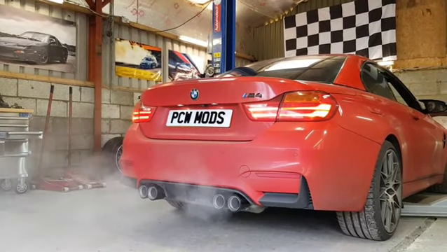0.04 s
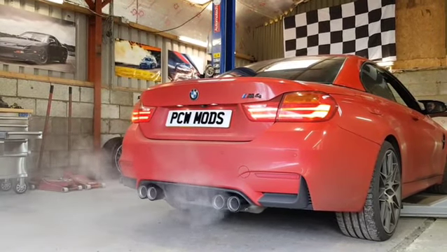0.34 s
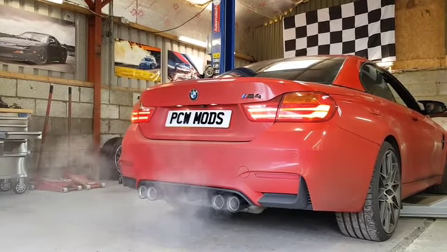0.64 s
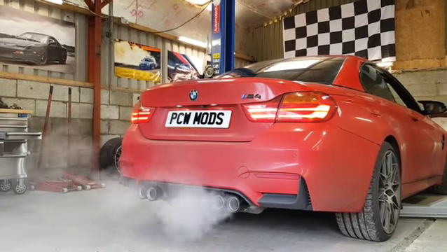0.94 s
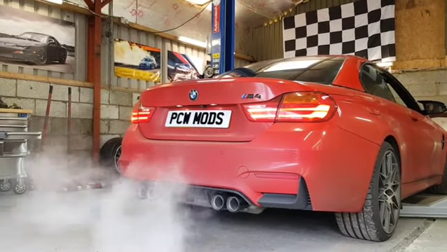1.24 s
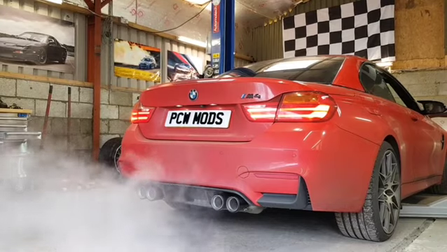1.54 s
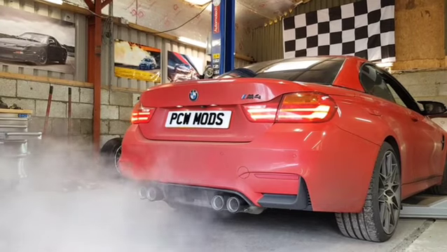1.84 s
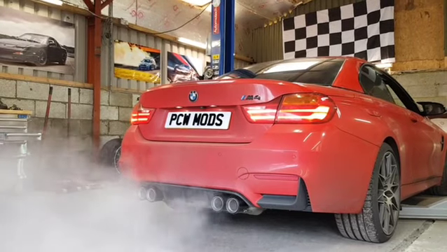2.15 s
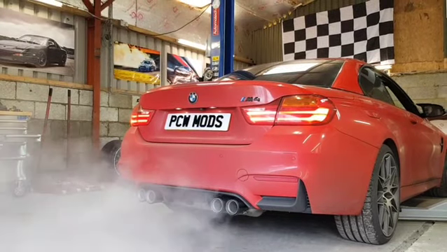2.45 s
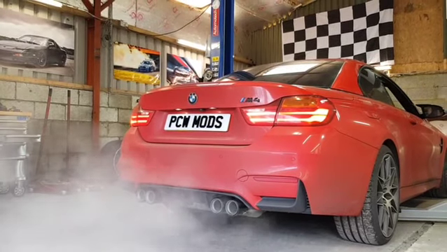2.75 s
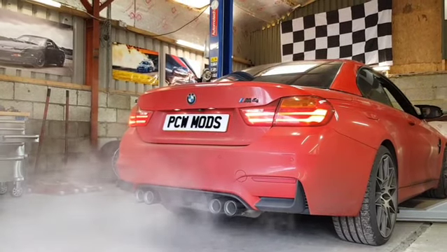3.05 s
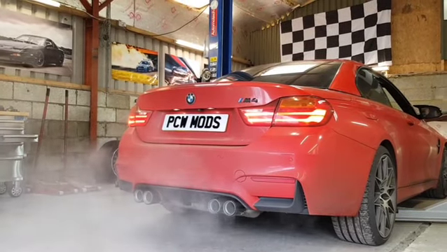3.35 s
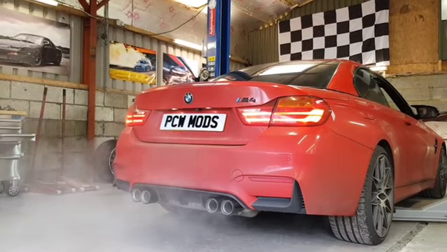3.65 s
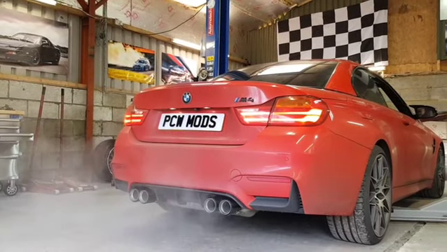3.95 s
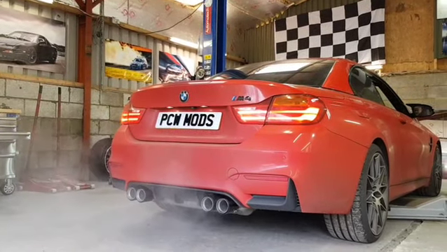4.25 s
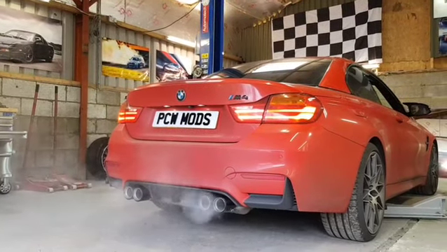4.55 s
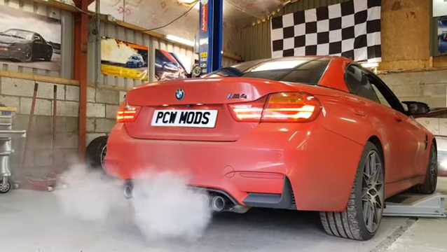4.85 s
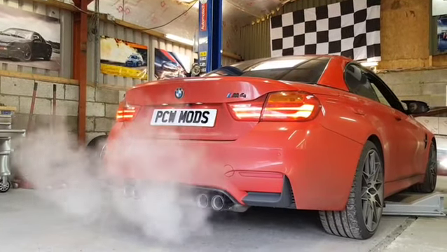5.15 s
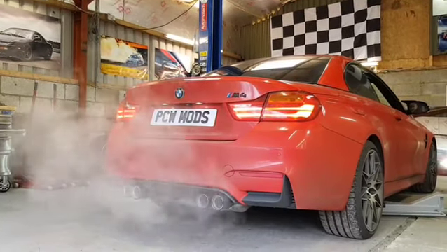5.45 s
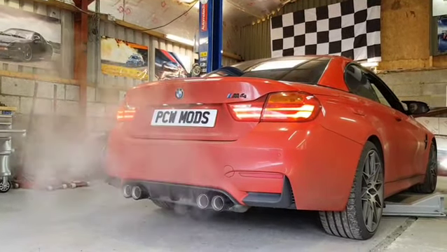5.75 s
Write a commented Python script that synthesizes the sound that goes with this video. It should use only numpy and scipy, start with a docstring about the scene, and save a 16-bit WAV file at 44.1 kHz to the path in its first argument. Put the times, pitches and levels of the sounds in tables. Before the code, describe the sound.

A six-cylinder sports car settles to a low idle, then revs with a deep boom that sharpens into a metallic rasp. The engine burbles back down as the exhaust fires off pops and sharp cracks. After a short idle, a second, lower rev follows and crackles away. The microphone is just behind the tailpipes, and the workshop walls throw back short echoes.

```python
"""A six-cylinder sports car is revved twice in a workshop, heard from just behind its tailpipes.
It sinks to idle, then at 0.8 s a blip booms in the pipes and sharpens to a metallic rasp as the revs
climb. From 1.4 s it burbles back down while unburnt fuel goes off in pops and sharp cracks that the
walls throw back. After a spell of idling, a second, lower rev starts at 4.5 s and crackles away."""
import sys
import numpy as np
from scipy import signal
from scipy.fft import rfft, irfft
from scipy.io import wavfile
from scipy.ndimage import uniform_filter1d

SR = 44100
rng = np.random.default_rng(int(sys.argv[2]) if len(sys.argv) > 2 else 0)


def to_wav(s):
    """Save 16-bit WAV."""
    ch = np.atleast_2d(s).T  # columns
    pcm = np.round(np.clip(ch, -1, 1) * 32767)  # PCM
    wavfile.write(sys.argv[1], SR, pcm.astype(np.int16))


N = 261072
TIME = np.arange(N) / SR
BINS = np.fft.rfftfreq(16384, 1 / SR)


def engine_note(turns, pull_db_per_octave=1.0, coast_db_per_octave=9, flutter_db=5):
    """The lowest engine orders swell through pipe resonances, and flutter and smear when firing is rough."""
    # Harmonics of one bank's firing rate, from the first. Each row: idling, pulling, coasting level in dB.
    orders = [(-42, -27.5, -42), (-32, -12.5, -45), (-41, -19.5, -46), (-38, -22, -47.5), (-41, -21.5, -53),
              (-57, -21.5, -46), (-43.5, -23, -56), (-36, -25, -52)]
    # How the pipes pass those tones. Each row: frequency in Hz, gain in dB.
    pipe_gain = [(25, -17), (44, -12), (56, 2.5), (68, -11), (81, -11.5), (97, -9), (111, -0.5), (122, -3),
                 (142, -2), (160, 1), (183, -8), (210, -5.5), (250, -5.5), (330, -18), (700, -11)]
    # The firing locks onto a pipe resonance. Each row: start and end in seconds, boost in dB.
    locks = [(1.418, 1.534, 9), (1.924, 2.07, 8.5), (4.52, 4.629, 6), (5.138, 5.353, 3.5)]
    idle, pull, coast = driving("bass")
    pull = pull * amp(pull_db_per_octave * octaves())
    coast = coast * amp(coast_db_per_octave * octaves())
    bank_hz, rough = bank_rate(), roughness()
    stumble = unit(uniform_filter1d(rng.standard_normal(N), size=600))
    turns = turns + .2 * rough ** 3 * stumble
    lock_db = sum(db * swell(start, end, rise_s=.088, fall_s=.028) for start, end, db in locks)
    note = np.zeros(N)
    for order, (idle_db, pull_db, coast_db) in enumerate(orders, 1):
        strength = idle * amp(idle_db) + pull * amp(pull_db) + coast * amp(coast_db)
        flutter = unit(uniform_filter1d(uniform_filter1d(rng.standard_normal(N), size=1200), size=1200))
        gain_db = log_curve(pipe_gain, order * bank_hz) + flutter_db * rough ** 2 * flutter
        if order <= 3:
            gain_db += lock_db
        note += strength * amp(gain_db) * np.sqrt(2) * np.sin(2 * np.pi * order * turns)
    return note


def rumble(turns, boom_db=-1.0, drone_db=0.5, growl_db=-3):
    """Uneven firings ring the long, low modes of pipes and silencer."""
    # Exhaust modes, low to high. Each row: frequency in Hz, width in Hz, relative level in dB.
    boom_modes = [(45.2, 11, -18), (58.94, 11, 9)]
    drone_modes = [(101.8, 13, -8), (141.2, 27, -0.5), (159, 16.4, 0.5)]
    growl_modes = [(209, 24.4, -5), (244.8, 38, 0.5), (283, 37.3, -1)]
    # How each voice follows throttle and revs; loudness() lists the entries.
    boom_law = (-47, -32, -34, -15, -41.5, 4.5)
    drone_law = (-43.5, -42.5, -20.5, -4.5, -41, 7.5)
    growl_law = (-45.5, -41, -19, 1, -33, 1.5)
    pulses = firings(turns, scatter=.83, jitter_s=.0016, weak_bank=.45)
    drive = unit(pulses) + puffs(pulses, decay_s=.0041, between=1.0)
    drive = signal.sosfilt(signal.butter(4, 38, "high", fs=SR, output="sos"), drive)
    voices = ((boom_modes, loudness(boom_law, "bass") + boom_db),
              (drone_modes, loudness(drone_law, "bass") + drone_db),
              (growl_modes, loudness(growl_law, "mid") + growl_db))
    return sum(amp(db) * steady(colour(drive, resonances(modes, steepness=2.11)), size=2000)
               for modes, db in voices)


def bark(turns, pipe, bark_db=-2.5, calm_db=-44):
    """Hollow mid-range voice: cleaner pulses in a pull, ragged puffs in the burble, a murmur at idle."""
    # The bark's tone colour. Each row: frequency in Hz, relative level in dB.
    bark_eq = [(150, -53.5), (300, 3.5), (450, 4.5), (850, -1), (1100, -10), (1600, -17.5), (3000, -27),
               (8000, -39)]
    # How it follows throttle and revs; loudness() lists the entries.
    bark_law = (-57.5, -46, -19, 5, -32, 3)
    level_db = loudness(bark_law, "mid")
    pulses = firings(turns, scatter=.7, jitter_s=.0003)
    drive = steady(unit(pulses) + 4 * roughness() ** 2 * puffs(pulses, decay_s=.006, between=.5))
    drive += amp(calm_db - level_db) * rng.standard_normal(N)  # the silencer smooths weak pulses to a flow
    hollow = colour(drive, pipe * amp(log_curve(bark_eq)))
    return amp(level_db + bark_db) * steady(hollow, size=2400)


def rasp(turns, pipe, rasp_db=0.5, sizzle_db=-3, edge=0.48, rush=0.27):
    """Under load the pulses steepen into a metallic rasp, and each tears off a sizzling jet."""
    # Tone colours of rasp and jet. Each row: frequency in Hz, relative level in dB.
    rasp_eq = [(400, -29.5), (900, 0.5), (1400, -3), (1900, 1), (2300, 3.5), (2800, 6), (3900, -1),
               (4600, -3), (7000, -17), (16000, -51)]
    sizzle_eq = [(2000, 4), (3500, -13), (4600, 12), (5200, 8.5), (6700, -1.5), (7400, 6.5), (8200, -17),
                 (13000, -15), (16000, -28)]
    # How each follows throttle and revs; loudness() lists the entries.
    rasp_law = (-51.5, -46.5, -21, 5, -50, 29)
    sizzle_law = (-56, -49, -30, 7, -56.5, 20)
    metal_db, jet_db = loudness(rasp_law, "treble"), loudness(sizzle_law, "treble")
    pulses = firings(turns, scatter=1.4, jitter_s=.0006)
    load = amp((metal_db - metal_db.max()) / 2)
    steep_pulses = edge * steady(pulses) + puffs(pulses, decay_s=.0028, between=.25)
    drive = load * steep_pulses + rush * rng.standard_normal(N)
    jet = load * puffs(pulses, decay_s=.0032, between=.095) + rush * rng.standard_normal(N)
    metal = steady(colour(drive, pipe * amp(log_curve(rasp_eq))))
    sizzle = steady(colour(jet, amp(log_curve(sizzle_eq))))
    return amp(metal_db + rasp_db) * metal + amp(jet_db + sizzle_db) * sizzle


def afterfire(pipe, pop_db=15, crack_db=17, burn_s=.00081, shock_s=.0026, sputter_s=.05):
    """A pop is a flare of flame, a shock and a trailing sputter; its slap off a wall has the same shape."""
    # Exhaust pops and cracks, some followed 10-30 ms later by a hard slap off the walls. Each row: start
    # in seconds, pop level in dB, crack level in dB, sputter level in dB relative to the pop.
    pops_and_slaps = [(.184, -38, -76, -33), (.241, -36, -64, -25), (.849, -8, -46, -13),
                      (.868, -14.5, -49, -7), (1.024, -10, -27, -34), (1.501, -14, -14.5, -23),
                      (1.539, -5, -12.5, -8.5), (1.633, -5.5, -14, -18), (1.723, -8.5, -16.5, -6.5),
                      (1.736, -6, -13.5, -13), (1.883, -10, -31, -12.5), (1.903, -6.5, -13, -11),
                      (1.914, -6, -27, -13.5), (2.1, -7.5, -6.5, -13), (2.127, -8, -12, -29),
                      (2.301, -10, -32, -33), (2.316, -13.5, -48, -13), (2.34, -10.5, -13.5, -24),
                      (2.45, -14, -43, -7.5), (2.466, -10.5, -44, -12), (2.507, -16, -55, -22),
                      (2.524, -15, -57, -25), (2.606, -37, -60, -25), (2.658, -9, -46, -15),
                      (2.735, -5.5, -36, -38), (2.752, -26, -60, -12), (4.549, -23, -63, -11),
                      (4.625, -15.5, -42, 3.5), (5.117, -3.5, -33, -6.5), (5.148, -13, -14.5, -5),
                      (5.163, -5.5, -17, -12), (5.274, -5, -23.5, -10), (5.396, -9, -63, -16),
                      (5.471, -3, -30.5, -29), (5.601, -6.5, -34.5, -19), (5.695, -8.5, -46, -13.5),
                      (5.821, -5.5, -33, -9.5)]
    # Tone colours of pop and crack. Each row: frequency in Hz, relative level in dB.
    pop_eq = [(60, -53), (200, 2.5), (400, 3), (800, 3.5), (1500, -2.5), (2400, 2), (4000, -5.5),
              (7000, -5.5), (8500, -63), (16000, -73)]
    crack_eq = [(800, -90), (2500, 10), (3800, 8.5), (5500, 6.5), (7000, 7.5), (8200, -9), (10500, -7.5),
                (13000, 0), (16000, -28)]
    t = np.arange(3000) / SR
    age = t / burn_s
    pops, cracks = np.zeros((2, N))
    for start, pop_level, crack_level, sputter_db in pops_and_slaps:
        sputter = [(sputter_s * u, sputter_db) for u in rng.random(4)]
        for delay_s, db in [(.0011, .042)] + sputter:
            burst = rng.standard_normal(len(t)) * age ** 2 * np.exp(-age)
            burst /= np.linalg.norm(burst)
            burst[np.searchsorted(t, shock_s)] -= 1  # the shock
            add(pops, start + delay_s, amp(pop_level + pop_db + db) * burst)
            # Weak pops hardly crack.
            add(cracks, start + delay_s, amp(crack_level + crack_db + 2 * db) * burst)
    return colour(pops, pipe * amp(log_curve(pop_eq))) + colour(cracks, amp(log_curve(crack_eq)))


def hiss(turns, hiss_db=10):
    """Smooth rush of gas, fluttering slightly with the firings."""
    # The tone colour of the gas. Each row: frequency in Hz, relative level in dB.
    hiss_eq = [(410, -37), (700, -1), (898, -22), (1120, 3), (1210, -8.5), (1840, -4), (2190, -1),
               (2730, -0.5), (3840, -35), (4490, -10), (4990, -22), (7390, -10), (8760, -33.5),
               (12000, -19.5), (16000, -32)]
    # How it follows throttle and revs; loudness() lists the entries.
    hiss_law = (-66.5, -54.5, -44, 3.5, -72.5, 24)
    # Faint fizzes in the hiss. Each row: start and end in seconds, level in dB.
    fizzes = [(0.434, 0.454, -57), (3.111, 3.14, -70), (3.29, 3.391, -61)]
    rush = puffs(firings(turns, scatter=.54, jitter_s=.00036), decay_s=.0043, between=6.9)
    fizz = sum(amp(db) * swell(start, end, rise_s=.034, fall_s=.025) for start, end, db in fizzes)
    envelope = amp(hiss_db) * np.hypot(amp(loudness(hiss_law, "treble")), fizz)
    return envelope * unit(colour(rush, amp(log_curve(hiss_eq))))


def tailpipe(ring_db=31, ring_width_hz=30):
    """Gain curve of the tips: broad resonances, rippled by narrow standing waves."""
    # Resonances of the tips. Each row: frequency in Hz, width in Hz, level in dB.
    tip_modes = [(701, 137, -0.5), (1287, 99, -3), (1666, 195, -5), (2293, 180, -9), (3590, 440, -13.5)]
    # Standing waves between car, floor and walls. Each row: frequency in Hz, relative level in dB.
    standing_waves = [(398.4, -42.5), (672.9, -46.5), (866.7, -37.5), (974.4, -58), (1152, -37.5),
                      (1303, -36.5), (1723, -36), (1820, -39), (1879, -54), (2148, -39), (2207, -42.5),
                      (2466, -41), (2977, -49), (3838, -63)]
    narrow_modes = [(hz, ring_width_hz, db + ring_db) for hz, db in standing_waves]
    return np.hypot(resonances(tip_modes, steepness=.9), resonances(narrow_modes, steepness=1.1))


def crank(wobble=.018):
    """Cycles turned by one cylinder bank; rough running makes the speed waver."""
    waver = unit(uniform_filter1d(rng.standard_normal(N), size=700))
    return np.cumsum(bank_rate() * (1 + wobble * roughness() * waver)) / SR


def firings(turns, scatter, jitter_s, weak_bank=0.53):
    """One pulse a firing; banks alternate strong and weak, and rough running scatters size and timing."""
    at = np.flatnonzero(np.diff(np.floor(2 * turns)))
    rough = roughness()[at]
    size, late = rng.standard_normal((2000, 2))[:len(at)].T
    bank_gain = np.where(np.arange(len(at)) % 2, weak_bank, 1)
    place = np.clip(at + (jitter_s * SR * rough * late).astype(int), 0, N - 1)
    pulses = np.zeros(N)
    pulses[place] = bank_gain * np.exp(scatter * rough * np.clip(size, -2, 2))
    return pulses


def puffs(pulses, decay_s, between):
    """Turbulence that flares after each pulse, over a steady share between them."""
    flare = signal.lfilter([1], [1, -np.exp(-1 / (decay_s * SR))], pulses)
    return unit((steady(flare) + between) * rng.standard_normal(N))


def bank_rate():
    """Firing rate of one cylinder bank in Hz, evened by the flywheel."""
    # The rev curve. Each row: time in seconds, firing rate in Hz.
    revs = [(0, 33.95), (.4, 21.94), (.73, 21.77), (.84, 33.96), (.94, 50.42), (1.12, 82), (1.3, 110.8),
            (1.44, 112.8), (1.7, 94.19), (1.95, 81.8), (2.1, 76.94), (2.5, 60.87), (3.1, 39.88),
            (3.85, 22.87), (4.2, 20.5), (4.52, 20.6), (4.59, 27.66), (4.64, 33.41), (4.79, 57.24),
            (4.9, 73.76), (4.99, 82.65), (5.1, 86.24), (5.3, 78.87), (5.5, 71.2), (5.92, 55.9)]
    return uniform_filter1d(np.interp(TIME, *np.transpose(revs)), size=2000)


def octaves(mid_revs_hz=60):
    """Engine speed in octaves above middle revs."""
    return np.log2(bank_rate() / mid_revs_hz)


def driving(register):
    """How strongly idling, pulling and coasting drive one register of the exhaust."""
    # What the engine is doing. Each row: start and end in seconds, then bass, mid and treble level in dB.
    idles = [(.38, .78, 0, 0.5, -2), (3.35, 3.62, -6, 0.5, -13.5), (3.8, 4.52, -0.5, -1.5, 0),
             (4.34, 4.54, 7, -8, -13)]  # the idle control feeds air to hold up the revs
    blips = [(.755, .88, 2, -0.5, -1), (.93, 1.26, -0.5, -2.5, 1.5), (4.465, 4.66, 3.5, 0, -1.5),
             (4.66, 4.83, 1, -1, 1), (4.82, 5.02, 1, -1.5, -9.5)]  # surges of throttle, a kick and then a pull in each rev
    coasts = [(-.3, .3, 5.5, 3, 20), (1.3, 1.5, 0, 3.5, -40), (1.3, 3.22, -5, -1, -0.5),
              (5.0, 6, 12.5, 6, 8)]  # the engine runs down, burbling
    # Their envelopes for bass, mid and treble. Each row: rise in seconds, fall in seconds.
    idle_shape = [(0.178, 0.065), (0.352, .08), (.42, .08)]
    blip_shape = [(.11, 0.086), (0.129, .09), (.13, .1)]
    coast_shape = [(0.12, 0.33), (0.05, 0.28), (0.05, 0.14)]
    band = ("bass", "mid", "treble").index(register)
    return [sum(amp(db[band]) * swell(start, end, *shape[band]) for start, end, *db in cues)
            for cues, shape in ((idles, idle_shape), (blips, blip_shape), (coasts, coast_shape))]


def loudness(law, register):
    """Level of a voice in dB, from what the engine is doing and how fast it turns."""
    # Each law: floor in dB, idling level in dB, pulling level in dB and its slope in dB per octave,
    # coasting level in dB and its slope in dB per octave.
    floor_db, idle_db, pull_db, pull_slope, coast_db, coast_slope = law
    revs = octaves()
    levels = (idle_db, pull_db + pull_slope * revs, coast_db + coast_slope * revs)
    power = sum((share * amp(db)) ** 2 for share, db in zip(driving(register), levels))
    return 10 * np.log10(amp(floor_db) ** 2 + power)


def roughness(coasting=.63, pull_smooths=.25, idle_smooths=.16):
    """Firing is ragged off the throttle, and evens out in a fast pull or a settled idle (0 to 1)."""
    idle, pull, _ = np.minimum(driving("mid"), 1)
    fast = np.clip(octaves() + 1, 0, 1)
    return np.clip(coasting - pull_smooths * pull * fast - idle_smooths * idle, 0, 1)


def workshop(x, tail_db=-4, smear_s=0.0064, echo_top_hz=4000, shared_hz=900):
    """Cluttered walls return a few smeared, dull echoes, then a diffuse tail."""
    # Echoes off walls and roof. Each row: delay in seconds, level in dB.
    walls = [(0.015, -1), (0.028, -5.5), (.045, -6)]
    # The room's reverb. Each row: frequency in Hz, seconds to fall by 60 dB, level in dB.
    reverb = [(60, 0.32, -33), (201, 0.24, 5), (498.3, 0.9, -1.5), (1100, 1, -1), (2980, 0.67, 0.5),
              (6900, 0.37, 4), (15037, 0.23, 3)]
    t = np.arange(SR) / SR
    echoes = np.zeros((2, SR))
    for delay_s, db in walls:
        cluster = rng.standard_normal((2, SR)) * np.exp(-abs(t - delay_s) / smear_s)
        echoes += amp(db) * cluster / np.linalg.norm(cluster, axis=1, keepdims=True)
    tail = rng.standard_normal((2, SR)) * np.minimum(t / .0013, 1) / np.sqrt(SR / 25)
    reflections = signal.lfilter(*signal.butter(1, echo_top_hz, fs=SR), echoes) + amp(tail_db) * tail
    hz, age, (left, right) = signal.stft(reflections, SR, nperseg=256)
    alike = 1 / (1 + (hz[:, None] / shared_hz) ** 2)  # long waves are the same on both sides
    spectra = np.array([left, alike * left + np.sqrt(1 - alike ** 2) * right])
    bands, *columns = np.transpose(reverb)
    t60, band_db = (log_curve(np.transpose([bands, column]), hz)[:, None] for column in columns)
    decay = amp(band_db) * np.exp(-np.log(1000) * age / t60)
    response = signal.istft(spectra * decay, SR, nperseg=256)[1]
    return signal.oaconvolve(x[None], response, axes=1)[:, :N]


def amp(db):
    """Decibels to gain."""
    return 10 ** (np.asarray(db) / 20)


def unit(x):
    """Scales to rms 1."""
    return x / np.sqrt(np.mean(x ** 2) + 1e-20)


def steady(x, size=4000):
    """Takes out slow swells and keeps the pulses."""
    power = uniform_filter1d(uniform_filter1d(x ** 2, size), size)
    return x / np.sqrt(abs(power) + 1e-14)


def swell(start, end, rise_s, fall_s):
    """Rises smoothly towards 1 and dies away after the end time."""
    rise = np.clip((TIME - start) / rise_s, 0, 1)
    return np.sin(np.pi / 2 * rise) ** 2 * np.exp(-np.maximum(TIME - end, 0) / fall_s)


def log_curve(points, hz=BINS):
    """Joins points along a log-frequency axis."""
    point_hz, value = np.transpose(points)
    return np.interp(np.log(hz + 1), np.log(point_hz + 1), value)


def resonances(modes, steepness):
    """Gain of a set of resonances; steepness sets how fast their skirts fall."""
    return np.sqrt(sum(amp(db) ** 2 / (1 + (2 * (BINS - hz) / width) ** 2) ** steepness
                       for hz, width, db in modes))


def colour(x, gain):
    """Minimum-phase filter shaped like this gain curve, with energy 1."""
    log_gain = np.log(np.maximum(gain / gain.max(), 1e-5))
    mirrored = np.concatenate([log_gain, log_gain[-2:0:-1]])
    taps = np.fft.ifft(np.exp(np.conj(signal.hilbert(mirrored)))).real[:len(BINS)]
    return signal.oaconvolve(x, taps / np.linalg.norm(taps))[:N]


def add(mix, start_s, sound):
    """Mixes a sound in at a time."""
    part = mix[max(round(start_s * SR), 0):][:len(sound)]
    part += sound[:len(part)]


def scene(engine_send_db=-2, pop_send_db=-1):
    """The exhaust up close; everything but the engine note also feeds the room."""
    turns, pipe = crank(), tailpipe()
    engine = rumble(turns) + bark(turns, pipe) + rasp(turns, pipe) + hiss(turns)
    pops = afterfire(pipe)
    room_send = amp(engine_send_db) * engine + amp(pop_send_db) * pops
    return engine_note(turns) + engine + pops + workshop(room_send)


def record(dry, knee=0.3, shading=0.75, top_hz=16100):
    """Colours left and right differently, softly overloads the peaks and cuts the very top."""
    # Stereo balance. Each row: frequency in Hz, left minus right in dB before shading scales it.
    balance = [(60, 0.5), (92, 2), (140, 0.5), (210, 4.5), (330, -1), (500, 0.5), (770, 1), (1170, -2.5),
               (1790, -2), (2740, -4.5), (4190, -1.5), (6410, 2), (9810, 15.5), (15000, -2)]
    # Stereo phase. Each row: frequency in Hz, left's lead in radians before it is faded out of the lows.
    phase = [(0, 28), (950, -2), (1290, 1.1), (1810, 2.0), (2240, -0.14), (3620, 7.5), (4130, 7),
             (5680, 11.5), (8870, 19), (11400, 20.5), (13400, 20), (14300, -4), (15200, 31), (16100, 40)]
    hz = np.fft.rfftfreq(2 * N, 1 / SR)
    lead = log_curve(phase, hz) * hz ** 4 / (hz ** 4 + 1000 ** 4)  # long waves reach both sides in step
    left_gain = amp(shading * log_curve(balance, hz) / 2) * np.exp(.5j * lead)
    stereo = irfft(rfft(dry, 2 * N) * np.array([left_gain, 1 / left_gain]))[:, :N]
    clean = np.clip(stereo, -knee, knee)
    saturated = clean + (1 - knee) * np.tanh((stereo - clean) / (1 - knee))
    lowpass = signal.firwin(401, top_hz, window=("kaiser", 9), fs=SR)
    return signal.oaconvolve(saturated, lowpass[None], "same")


dry = scene()
out = record(dry)
to_wav(out)
```